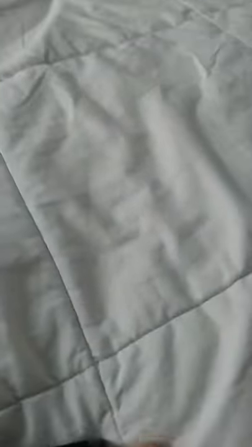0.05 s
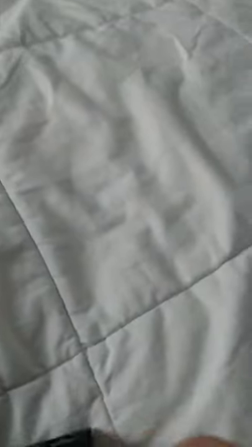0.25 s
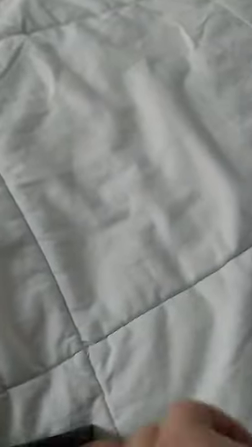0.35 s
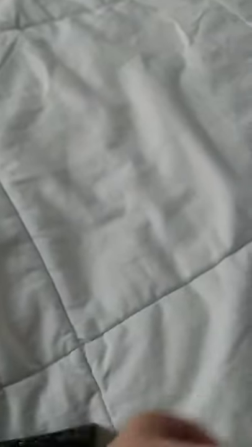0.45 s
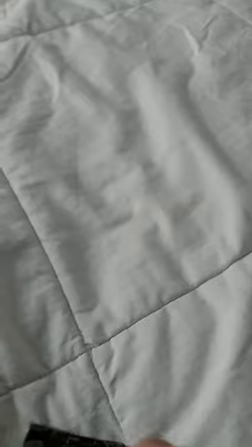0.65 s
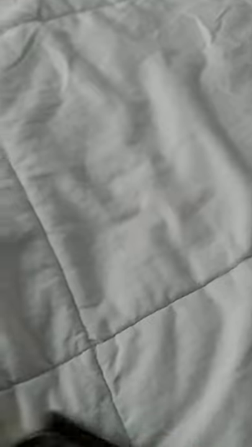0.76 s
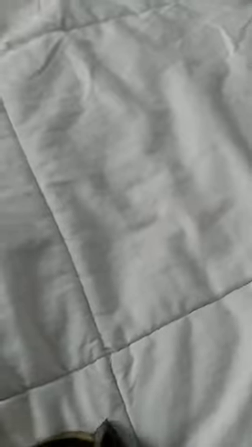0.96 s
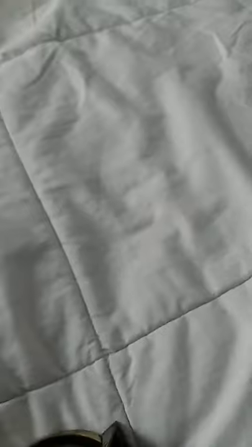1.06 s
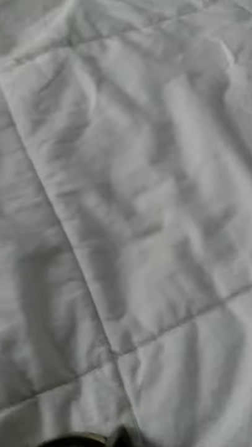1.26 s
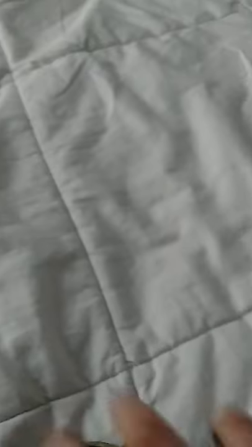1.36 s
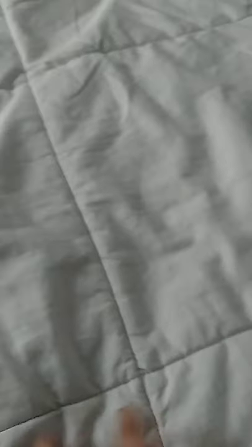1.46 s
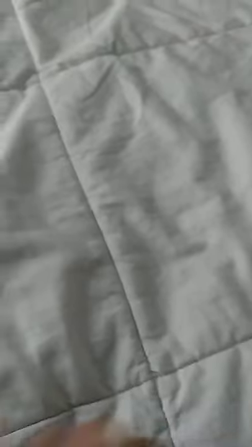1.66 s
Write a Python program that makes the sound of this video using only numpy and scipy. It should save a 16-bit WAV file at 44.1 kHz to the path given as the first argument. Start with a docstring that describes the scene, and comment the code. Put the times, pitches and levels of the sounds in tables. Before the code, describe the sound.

A wind-up alarm clock's ratchet starts clicking rapidly at about 0.2 seconds, close up in a small room, with a faint, high bell ring until around 0.6. The clicks slow briefly, then run on unevenly. From 1.1 to 1.4 seconds, fingers bump the microphone's left side with low thumps and rumble. Fast, even clicking continues to about 1.7 seconds, with another slight touch of the bell.

```python
"""In a small room, over a bed, a wind-up twin-bell alarm clock is turned in the hand, close up.
Its ratchet clicks in uneven runs: each drop of the pawl is a short chatter that rings the steel
and the plates, with a dull knock of the case. Now and then a hammer touch or a click's jolt rings
a bell. Fingers rub the case and bump the left side of the microphone, over a faint room tone."""
import sys
import numpy as np
from scipy import signal
from scipy.fft import rfft, irfft
from scipy.io import wavfile

SR = 44100
rng = np.random.default_rng(int(sys.argv[2]) if len(sys.argv) > 2 else 0)


def bounce(signal):
    """Save signal as a 16-bit WAV file at the path given by the first command-line argument."""
    frames = np.transpose(np.atleast_2d(signal))
    limited = np.clip(frames, -1, 1)
    pcm = np.round(limited * 32767).astype(np.int16)
    wavfile.write(sys.argv[1], SR, pcm)


N = 74970
T = np.arange(N) / SR

# tone curve of the quiet air: (frequency [Hz], relative level [dB])
AIR_CURVE = [(25, -10), (80, 8), (300, -0.5), (450, -22), (720, -16.5), (1200, -7.5), (2000, -10.5),
             (6000, -16.5), (9500, -7.5), (16000, -13.5)]
# a brief low thump at the very start, then the level of the grip's rumble:
# (time [s], left level [dB], right level [dB])
RUMBLE_RIDE = [(0, -65, -70.5), (.02, -51.5, -60), (.05, -81, -93), (.4, -83, -81), (.63, -76, -74),
               (.675, -66, -63.5), (.72, -80, -78), (1.03, -73.5, -76), (1.078, -48.5, -79),
               (1.15, -45.5, -80), (1.242, -35, -77), (1.31, -50, -80), (1.39, -50, -79),
               (1.48, -70.5, -95), (1.52, -76, -88), (1.548, -54.5, -56), (1.68, -66.5, -72)]
# tone curve of that rumble: (frequency [Hz], relative level [dB])
RUMBLE_CURVE = [(25, -16), (40, -3), (58, 3.5), (100, -8.5), (200, -12.5), (320, -21.5), (600, -34),
                (1500, -49), (16000, -55)]
# fingers bump the microphone: (time [s], left level [dB], pitch [Hz])
BUMP_CUES = [(1.071, -37, 68.6), (1.1, -26, 88), (1.166, -22, 81), (1.201, -24, 123), (1.24, -22.5, 107),
             (1.275, -27, 135), (1.327, -32, 96), (1.358, -31.5, 106)]
# fingers slide on the case: (peak time [s], spread of the swell as standard deviation [s], level [dB], centre
# [Hz], bandwidth [Hz])
RUB_CUES = [(0.131, 0.0036, -59.5, 2315, 885), (0.174, 0.023, -59, 412, 60.6), (0.83, 0.036, -70, 241, 167),
            (0.937, 0.0095, -54, 1720, 1190), (0.937, 0.0063, -52.5, 446, 305),
            (0.963, 0.0028, -43.5, 533, 127), (1.156, 0.0029, -57, 340, 137)]
# the bell's partials: (frequency [Hz])
PARTIAL_HZ = [790, 1862, 3303, 5108, 7276, 7311, 9802, 9822, 12646]
# how each partial rings: (left gain [dB], right gain [dB], 60 dB decay [s])
PARTIAL_RINGS = [(-46.5, -48, 0.41), (-39, -75, .55), (-51, -52.5, 0.65), (-30, -28.5, 0.66),
                 (-31.5, -40.5, 0.46), (-33, -30.5, 0.64), (-22.5, -15.5, 0.35), (-40, -34, 0.24),
                 (-35, -47, 0.14)]
# the bell is set ringing by a hammer touch or a ratchet click's jolt:
# (time [s], low [dB], mid [dB], high [dB], top [dB])
BELL_CUES = [(.229, -3.5, -2, -3, 0), (0.283, 0, -1, 2.5, 3.5), (0.388, -5.5, -2.5, -15, -36),
             (0.456, -17.5, -0.5, -14, -12), (0.514, -40, -20.5, -16.5, -46),
             (1.499, -14.5, -17.5, -20, -33), (1.68, -18, -5, -7, -25)]
# where those four bands sit: (frequency [Hz])
BELL_BANDS_HZ = [3300, 5100, 7300, 9800]
# the pawl drops off a tooth; layer levels before their trims:
# (time [s], steel [dB], lower case mode [dB], upper case mode [dB], plates [dB])
CLICK_CUES = [(0.1661, -39, -41, -50, -51.5), (0.1996, -35.5, -40.5, -44.5, -45.5),
              (0.2252, -29.5, -42, -45, -42.5), (0.2533, -29.5, -46.5, -52, -41.5),
              (0.2823, -21, -36, -68, -39), (0.3084, -30.5, -42.5, -45, -44.5),
              (0.3334, -31, -49, -43, -44.5), (0.3641, -36.5, -40, -54, -42),
              (0.389, -31, -42.5, -42.5, -46), (0.4226, -34.5, -68, -47.5, -42),
              (0.4508, -30, -61, -43.5, -44.5), (0.4794, -34.5, -45.5, -44.5, -49),
              (0.5162, -34.5, -56.5, -57, -48), (0.599, -30.5, -62, -88, -57.5),
              (0.661, -34, -67, -82, -67.5), (0.7165, -32.5, -57.5, -93, -61),
              (0.7754, -32.5, -65, -67, -55), (0.7982, -31.5, -69, -81, -54.5), (0.847, -32, -61, -70, -55),
              (0.8645, -31.5, -55, -66, -58.5), (0.8811, -30, -49.5, -56, -53),
              (0.8988, -32.5, -57, -61, -51), (0.9236, -30, -49.5, -49, -53.5),
              (0.9633, -31.5, -50, -57, -50), (1.041, -32, -75, -66, -60), (1.0809, -31, -54, -59, -57),
              (1.1738, -39.5, -70, -61, -53.5), (1.205, -33.5, -46, -49, -48),
              (1.2372, -31.5, -56, -51.5, -48), (1.2675, -29.5, -50, -64, -49.5),
              (1.297, -29.5, -67, -60, -43), (1.3257, -29.5, -58, -41.5, -51),
              (1.356, -34, -87, -53, -46.5), (1.3842, -29, -81, -43, -46.5), (1.4142, -29, -80, -66, -46),
              (1.4427, -27.5, -80, -42.5, -54.5), (1.4711, -31, -80, -51.5, -47.5),
              (1.4992, -30.5, -59, -49, -49), (1.5314, -34.5, -59.5, -52.5, -47.5),
              (1.5564, -33.5, -55.5, -59, -47.5), (1.5807, -32, -56, -56, -46.5),
              (1.6157, -31, -50.5, -48.5, -50), (1.6451, -28, -48.5, -46.5, -49.5),
              (1.6732, -25, -50, -52, -48)]
# pan of the steel as the clock turns: (time [s], left minus right [dB])
STEEL_PAN = [(.2, -0.5), (.5, -0.5), (.7, -5), (1.15, -6.5), (1.35, -2), (1.68, -1.5)]
# resonances of pawl and spring: (frequency [Hz], bandwidth [Hz], gain [dB])
STEEL_MODES = [(4927, 345, -12), (5650, 133, -10.5), (7250, 1670, -9), (8954, 640, -0.5), (9690, 223, 3),
               (10595, 440, 1), (11390, 3600, -8.5), (13760, 2800, -10)]
# resonances of the movement's plates: (frequency [Hz], bandwidth [Hz], gain [dB])
PLATE_MODES = [(938, 500, -2), (1663, 345, 0.5), (2262, 370, 2), (3375, 440, -8), (3742, 171, 3.5),
               (5444, 285, 5.5)]
# the case, damped by the hand: (frequency [Hz], trim [dB], left minus right [dB])
CASE_MODES = [(721, -1.5, 4), (1097, 0, -2.5)]

BUMP_RISE_S, BUMP_RIGHT_DB = 0.0024, -49
BELL_ATTACK_S, BELL_LAG_S, CLICK_LAG_S = 0.00062, 0.000306, 0.00023  # lags delay the right side
CHATTER_PEAK_S, CHATTER_WIDTH_S, CHATTER_LEAD_S = 0.004, 0.0018, 0.002
CONTACTS_PER_S, SCATTER_DB = 4200, -4
STEEL_TRIM_DB, PLATE_TRIM_DB = -2.5, 3
KNOCK_RISE_S, KNOCK_DETUNE = 0.0021, 0.054
ROOM_T60_S, ROOM_DB, PREDELAY_S = 0.22, -9, 0.003


def from_db(db):
    """Decibels to gain."""
    return 10 ** (np.asarray(db) / 20)


def pan(db):
    """Stereo gains for a left-minus-right balance."""
    return from_db([[db / 2], [-db / 2]])


def rms_one(x):
    """Scale each channel to rms 1."""
    return x / np.sqrt(np.mean(x ** 2, axis=-1, keepdims=True) + 1e-20)


def add(out, s, sound):
    """Drop a stereo sound onto the timeline."""
    i = max(int(s * SR), 0)
    out[:, i:i + sound.shape[1]] += sound[:, :max(N - i, 0)]


def resonate(x, hz, width_hz):
    """One resonance, unity gain at its peak."""
    r = np.exp(-np.pi * width_hz / SR)
    feedback = [1, -2 * r * np.cos(2 * np.pi * hz / SR), r * r]
    return signal.lfilter(np.array([1, 0, -1]) * (1 - r * r) / 2, feedback, x + 1e-18)


def body(x, modes):
    """Parallel resonances of alternating polarity."""
    return sum((-1) ** k * from_db(db) * resonate(x, hz, width)
               for k, (hz, width, db) in enumerate(modes))


def low_cut(x, hz):
    """Roll off the lows."""
    return signal.sosfilt(signal.butter(2, hz, "high", fs=SR, output="sos"), x)


def noise(curve):
    """Stereo noise shaped by a tone curve, rms 1."""
    hz, db = np.transpose(curve)
    gain = from_db(np.interp(np.log(np.fft.rfftfreq(N, 1 / SR) + 1), np.log(hz), db))
    shaped = irfft(rfft(rng.standard_normal((2, N))) * gain, N)
    return rms_one(low_cut(shaped, hz=36))


def grains(per_s, size):
    """Tiny random contacts, each with its own strength left and right."""
    return (rng.random(size) < per_s / SR) * rng.standard_normal((2, size))


def room_tone():
    """A faint, steady layer of air."""
    return from_db(-77.5) * noise(AIR_CURVE)


def reverb(x):
    """The small room's short, diffuse tail, different on each side."""
    tail = rng.standard_normal((2, N)) * np.exp(-np.log(1000) * T / ROOM_T60_S) * (T > PREDELAY_S)
    return signal.fftconvolve(x, rms_one(tail) / np.sqrt(N), axes=1)[:, :N]


def mic_handling():
    """A brief low thump opens; then fingers bump the microphone over the rumble of the grip."""
    times, left_db, right_db = np.transpose(RUMBLE_RIDE)
    fader = from_db([np.interp(T, times, left_db), np.interp(T, times, right_db)])
    rumble = fader * noise(RUMBLE_CURVE)
    bumps = 0
    for s, db, hz in BUMP_CUES:
        age = np.maximum(T - s, 0)
        envelope = age / BUMP_RISE_S * np.exp(1 - age / BUMP_RISE_S)
        bumps -= from_db(db) * envelope * np.sin(2 * np.pi * hz * age)
    return rumble + bumps * from_db([[0], [BUMP_RIGHT_DB]])


def finger_rubs():
    """Short, grainy slides of skin on the case."""
    out = 0
    for s, half_width, db, hz, width_hz in RUB_CUES:
        grit = grains(per_s=2000, size=N)
        friction = resonate(resonate(grit, hz, width_hz), hz, 2 * width_hz)
        swell = np.exp(-.5 * ((T - s) / half_width) ** 2)
        out += from_db(db) * swell * rms_one(friction)
    return out


def bell():
    """A hammer touch or a ratchet click's jolt feeds energy to the partials; close pairs beat."""
    out = np.zeros((2, N))
    t = T - BELL_CUES[0][0] - np.array([[0], [BELL_LAG_S]])
    for hz, (left_db, right_db, t60) in zip(PARTIAL_HZ, PARTIAL_RINGS):
        energy = 0
        for s, *bands_db in BELL_CUES:
            age = np.maximum(T - s, 0)
            attack = np.minimum(age / BELL_ATTACK_S, 1)
            strength = from_db(np.interp(hz, BELL_BANDS_HZ, bands_db))
            energy += attack * strength ** 2 * np.exp(-2 * np.log(1000) * age / t60)
        out += from_db([[left_db], [right_db]]) * np.sqrt(energy) * np.sin(2 * np.pi * hz * t)
    return out


def case_knock(hz, size):
    """One dull ring of the case swells and dies; the grip shifts its pitch."""
    age = np.maximum(T[:size] - CHATTER_LEAD_S - np.array([[0], [CLICK_LAG_S]]), 0)
    pitch = hz * (1 + KNOCK_DETUNE * rng.standard_normal())
    return rms_one(age * np.exp(-age / KNOCK_RISE_S) * np.sin(2 * np.pi * pitch * age))


def pawl_chatter(size):
    """A burst of tiny contacts, later on the right, widened by scatter off the hand."""
    swell = np.exp(-.5 * ((T[:size] - CHATTER_PEAK_S) / CHATTER_WIDTH_S) ** 2)
    direct = swell * grains(CONTACTS_PER_S, size)[0]
    scatter = from_db(SCATTER_DB) * swell * grains(CONTACTS_PER_S, size)
    return np.array([direct, np.roll(direct, int(CLICK_LAG_S * SR))]) + scatter


def ratchet():
    """Each click layers bright steel and clattering plates, rung by the pawl, with a case knock."""
    out = np.zeros((2, N))
    size = 2048
    click_gain = np.sqrt(.004 * SR / size)  # a layer carries the energy of 4 ms at its level
    for s, steel_db, lower_db, upper_db, plate_db in CLICK_CUES:
        chatter = pawl_chatter(size)
        steel = rms_one(low_cut(body(chatter, STEEL_MODES), hz=4440))
        steel *= from_db(steel_db + STEEL_TRIM_DB) * pan(np.interp(s, *np.transpose(STEEL_PAN)))
        plates = rms_one(low_cut(body(chatter, PLATE_MODES), hz=454))
        plates *= from_db(plate_db + PLATE_TRIM_DB)
        case = sum(from_db(db + trim_db) * pan(pan_db) * case_knock(hz, size)
                   for db, (hz, trim_db, pan_db) in zip((lower_db, upper_db), CASE_MODES))
        add(out, s - CHATTER_LEAD_S, click_gain * (steel + plates + case))
    return out


def scene():
    """The mix: ratchet and rubs feed the reverb; bell, handling and room tone stay dry."""
    clock = ratchet() + finger_rubs()
    return clock + from_db(ROOM_DB) * reverb(clock) + bell() + mic_handling() + room_tone()


def record(dry):
    """The microphone drops the deepest bass; the top is cut steeply."""
    thinned = low_cut(low_cut(dry, hz=31.5), hz=31.5)
    high_cut = signal.ellip(10, .2, 80, 15900, fs=SR, output="sos")
    return signal.sosfilt(high_cut, thinned)


dry = scene()
out = record(dry)
bounce(out)
```